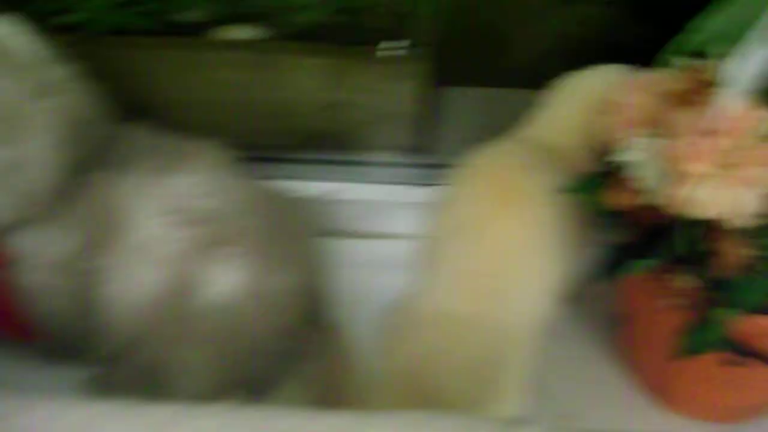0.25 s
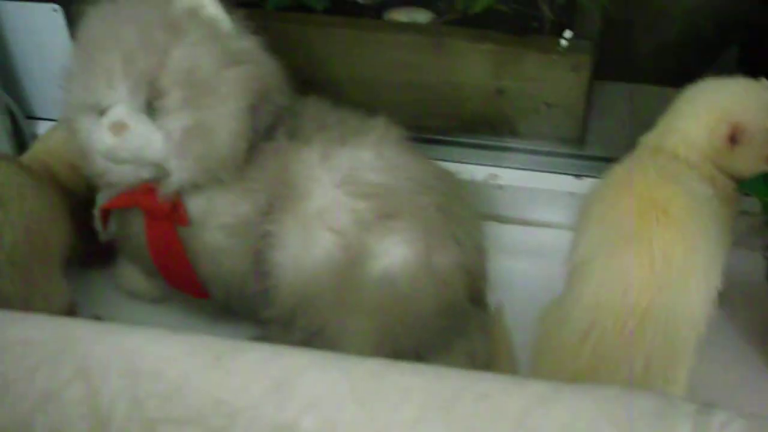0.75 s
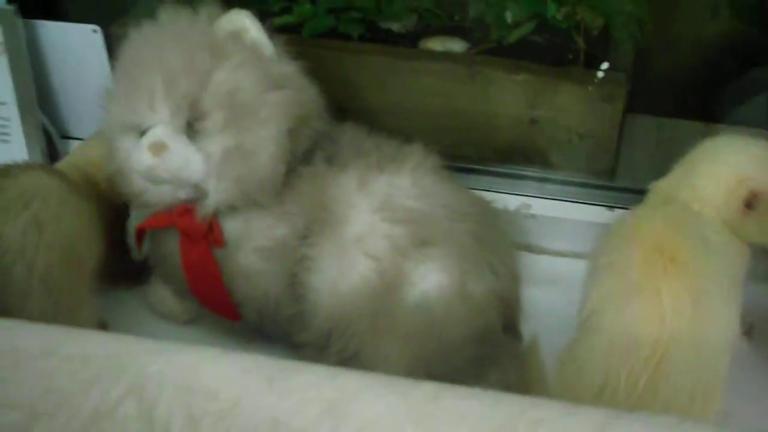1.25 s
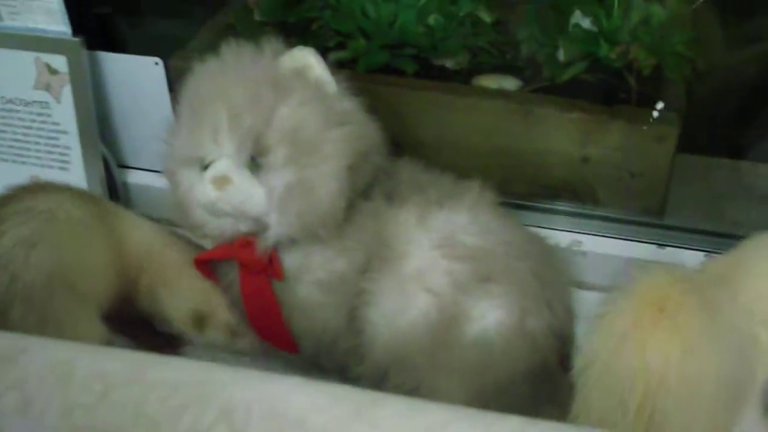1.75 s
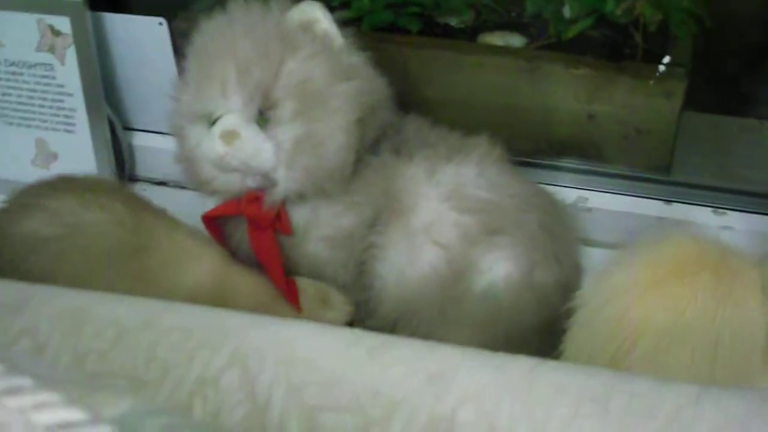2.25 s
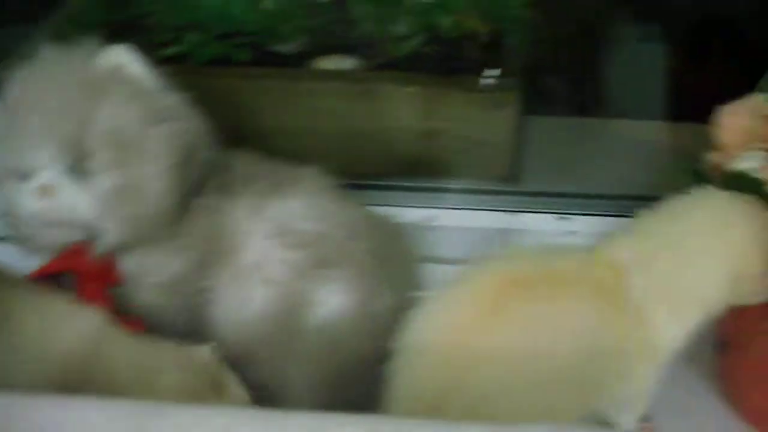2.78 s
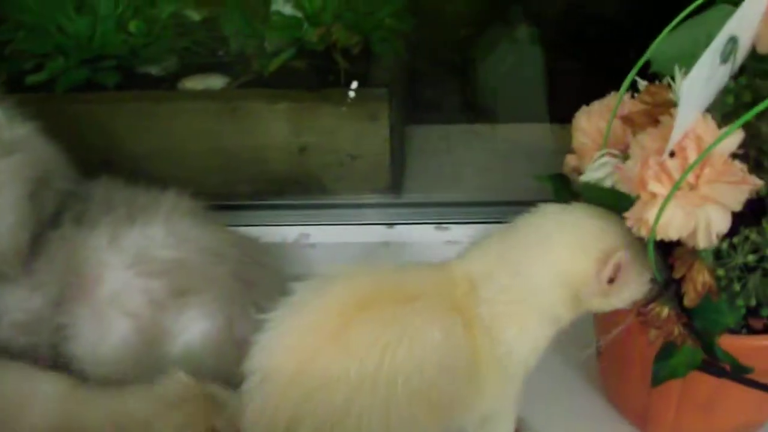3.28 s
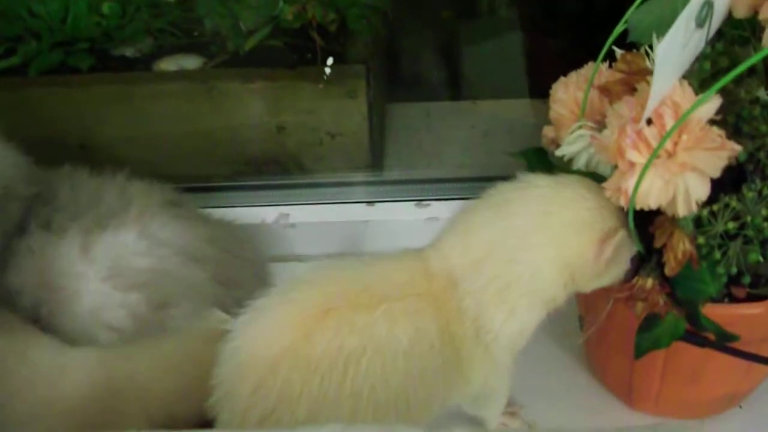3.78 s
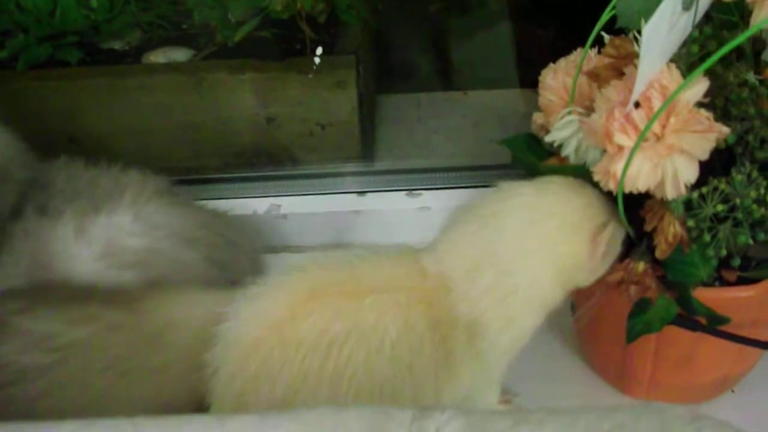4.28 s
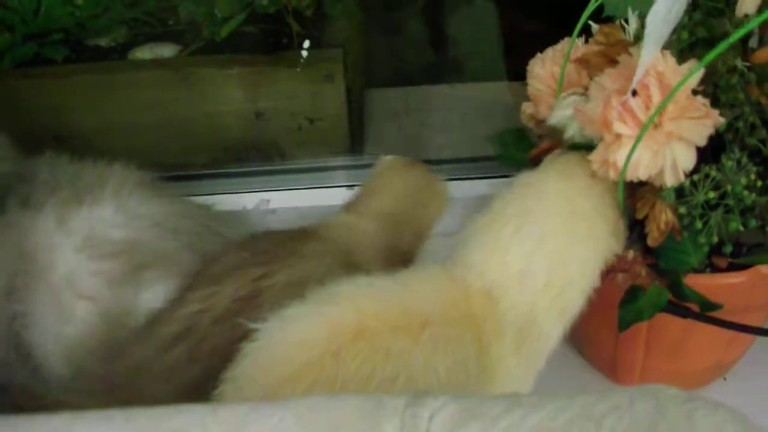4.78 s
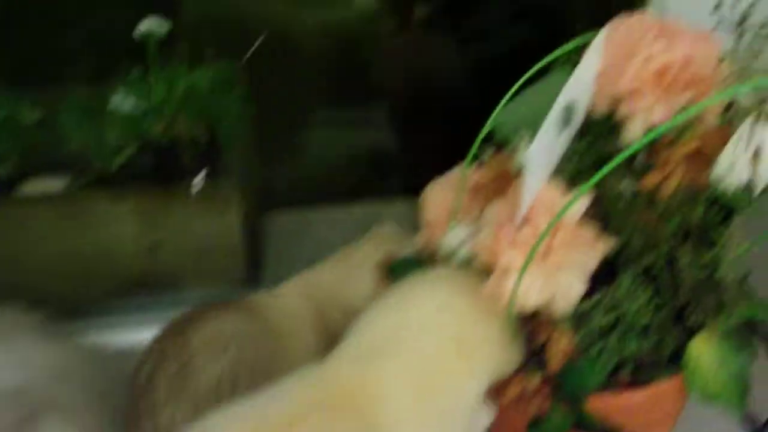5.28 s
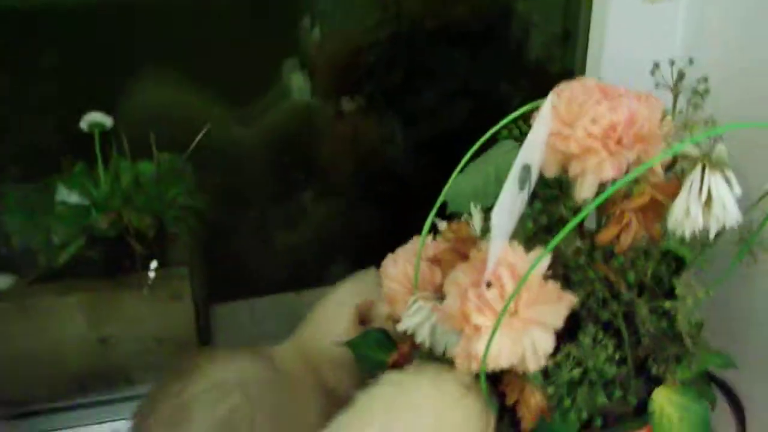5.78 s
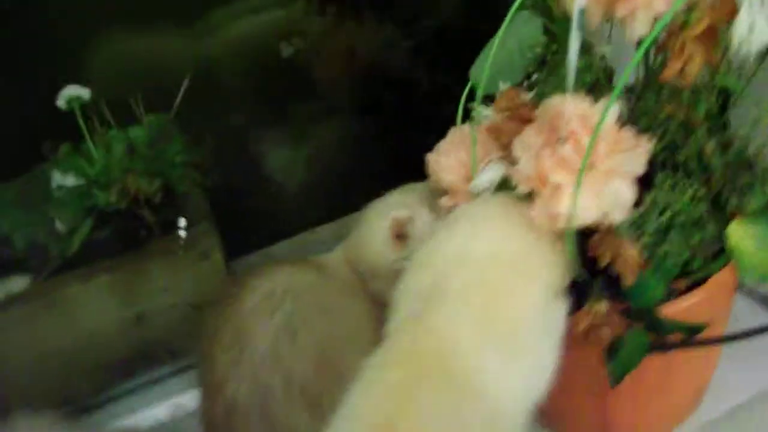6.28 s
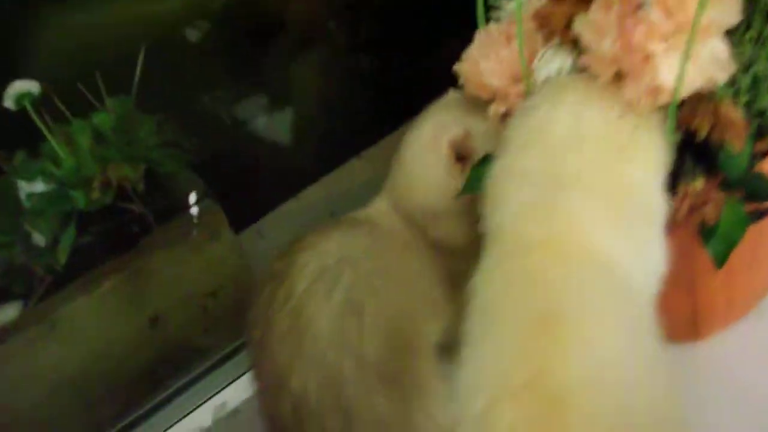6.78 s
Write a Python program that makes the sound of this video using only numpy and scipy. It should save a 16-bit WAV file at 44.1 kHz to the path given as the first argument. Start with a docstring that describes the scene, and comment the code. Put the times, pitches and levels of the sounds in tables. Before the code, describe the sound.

A close handheld microphone in a small, quiet room picks up ferrets on a windowsill. From 0 to 0.5 s, bright claw and stem clicks come in a quick flurry, with a plastic creak near 0.7 s. Clicks then become faint and scattered while fur brushes softly through leaves, a dry crackling swish fullest at about 2.1-2.5 s and fading after 3.4 s. At 3.65 s paws skid in a very short, sharp scrape that rings the sill; clicks follow near 4.5 s and a nearly dry scratch at 4.8 s. From 5.1 s fingers rub the casing, swelling until 5.3 s, with a low bump and sharp creaks around 5.4 s. Rustling continues; another creak comes at 6.1 s, a thump at 6.6 s, and rubbing peaks near 6.7 s. A click and scrape land at 6.9 s. Faint air, high hiss and low hum persist throughout.

```python
"""Two ferrets on a windowsill nose into a pot of flowers, heard from close by in a small quiet room.
First a flurry of claw and stem clicks (cracks with short rings), then fur in leaves (filtered grains),
fullest just after 2 s. Paws scrape in dense slips near 3.65 s, ringing the sill, and near 4.8 s, almost dry.
The hand-held camera bumps and creaks now and then (driven resonances), most from about 5 s, when fingers
also rub it; clicks and a scrape come near 6.9 s. Air, hiss (filtered noise) and hum (sines) lie under it all."""
import sys
import numpy as np
from scipy import signal
from scipy.fft import rfft, irfft
from scipy.io import wavfile
from scipy.ndimage import uniform_filter1d

SR = 44100
rng = np.random.default_rng(int(sys.argv[2]) if len(sys.argv) > 2 else 0)


def generate_wav(sig):
    """Save sig (samples, or channels by samples) to the path in sys.argv[1] as 16-bit PCM at SR."""
    pcm = np.round(np.clip(np.atleast_2d(sig).T, -1, 1) * 32767).astype(np.int16)
    wavfile.write(sys.argv[1], SR, pcm)


N = 310772
FREQ = np.maximum(np.fft.rfftfreq(N, 1 / SR), 1)
TIME = np.arange(N) / SR


# Claws and stems on the sill, close by; snap and body are relative to the ring:
# start_s [s], level_db [dB], ring_hz [Hz], decay_t60_s [s], snap_db [dB], body_db [dB]
CLAW_CLICKS = [(.014, -34.5, 4240, 0.0093, -19, 9), (.0666, -22.5, 5480, 0.053, -2, -3),
               (.0755, -25, 5770, 0.076, 2, 3), (.2029, -19.5, 4190, 0.021, -9.5, -33),
               (.2965, -27.5, 5600, 0.053, 2, -38), (.3539, -25, 4050, 0.0074, -9, -43),
               (.3632, -32, 5670, 0.021, 18, -24), (.382, -30.5, 9720, 0.041, -9, -32),
               (.418, -25.5, 3600, 0.03, 6.5, 0), (.456, -38.5, 3570, .064, -1, 3),
               (.599, -36, 3000, 0.064, 15.5, 20.5), (.6837, -39.5, 4470, 0.026, 9, 2),
               (.897, -38.5, 5000, .045, -3, -8.5), (.943, -41.5, 4960, 0.027, 3, -3),
               (1.024, -37.5, 6150, 0.043, -13, -32), (1.330, -40.5, 5900, .01, 18, -15),
               (1.631, -36.5, 4900, 0.021, -2, -16), (1.679, -43.5, 5600, 0.018, -1, -23),
               (1.898, -42.5, 4560, 0.0085, 9, -13), (1.997, -42, 6040, 0.013, 14, -26),
               (2.180, -37, 1200, 0.054, -17, 4), (2.245, -45, 1240, 0.061, -12, 3),
               (2.465, -37.5, 4220, 0.038, -22, -24), (2.537, -44.5, 7000, .015, -4, -24),
               (2.724, -42.5, 4870, 0.012, -2, -16), (2.771, -41, 4500, 0.033, 10, 4),
               (3.004, -35.5, 5000, 0.051, 7, 5.5), (3.6225, -30, 4340, 0.032, -5, -10),
               (3.6465, -27.5, 3220, 0.03, -26, -33), (3.6497, -22.5, 4680, .027, -34, -40),
               (3.654, -28.5, 1770, 0.074, -24, -21), (3.6587, -28, 4900, .015, -23, -29),
               (4.496, -29.5, 5560, 0.041, 5.5, -13), (4.5148, -35, 5740, 0.01, 11, -5),
               (4.543, -38, 5700, 0.0063, 21, 3), (5.6782, -30.5, 2670, 0.019, 8, -28),
               (5.814, -37.5, 3860, .019, -1, -14), (6.078, -35, 5900, 0.024, 10.5, 5.5),
               (6.337, -40.5, 2810, 0.021, -14, -16), (6.398, -42.5, 5000, 0.0077, -6, 1),
               (6.4445, -27, 5400, 0.0055, 4.5, -20), (6.5805, -30, 1900, 0.015, -8, 12),
               (6.906, -31, 1280, 0.096, -16, 17), (6.934, -22.5, 4600, 0.034, -5, -1.5)]


def clicks():
    """A claw or stem snaps: a bright crack, a short ring in a spray of micro-slips, and a dull body."""
    out = np.zeros(N)
    t = TIME[:SR // 10]
    for start_s, level_db, ring_hz, t60_s, snap_db, body_db in CLAW_CLICKS:
        decay = undb(-60 * t / t60_s)
        spray, snap, dull = rng.standard_normal((3, len(t))) * decay
        partials = sum(undb(gain_db) * np.sin(2 * np.pi * ratio * ring_hz * t)
                       for ratio, gain_db in [(1, 8), (1.1, -27), (1.8, -22)])
        # the ring is damped sooner than the spray, as the claw stays in touch
        damped_ring = blow(partials * decay * np.exp(-t / 0.009))
        ringing_spray = blow(ring(ring(spray, ring_hz, .5 * ring_hz), ring_hz, 1.0 * ring_hz))
        tone = blow(ringing_spray + undb(-2.5) * damped_ring)
        crack = blow(soften(ring(snap, 6600, 8300), 15200))
        thud = blow(soften(ring(dull, 1470, 2300), 2400))
        click = blow(tone + undb(snap_db) * crack + undb(body_db) * thud)
        add(out, start_s, undb(level_db) * click)
    return out


# Paws skidding on the sill, close by; ring_db is the sill relative to the scratch:
# peak_s [s], level_db [dB], rise_s [s], fall_s [s], ring_db [dB]
PAW_SCRAPES = [(0.083, -54, 0.027, 0.019, -23), (3.652, -22.5, 0.003, 0.0038, 26),
               (4.72, -45.5, 0.036, 0.025, -18), (4.796, -29.5, 0.016, 0.017, -43),
               (6.937, -23.5, 0.0053, 0.0042, -27)]
# Resonances of the sill: mode_hz [Hz], width_hz [Hz], gain_db [dB]
SILL_MODES = [(1750, 400, -3), (2400, 350, -5), (3350, 250, -2), (4680, 280, 0), (4940, 250, -1),
              (5900, 500, -5), (7200, 350, -9), (8050, 300, -12)]
# Colour of claws scratching: freq_hz [Hz], relative density_db [dB per Hz]
SCRATCH_COLOUR = [(180, -30), (300, -7), (814, -13), (1140, -14.5), (1840, -10), (2570, -7.5), (4020, 1),
                  (4520, 2), (5340, 1), (12500, -11.5), (16000, -23)]


def scrapes():
    """Claws skid in dense slips: mostly dry scratching, but near 3.65 s mostly the ring of the sill."""
    slips = grains(5000, 1.0)
    scratch = colour(slips, SCRATCH_COLOUR)
    sill = unit(body(slips, SILL_MODES))
    out = np.zeros(N)
    for peak_s, level_db, rise_s, fall_s, ring_db in PAW_SCRAPES:
        distance = np.maximum((peak_s - TIME) / rise_s, (TIME - peak_s) / fall_s)
        stroke = np.exp(-distance ** 1.47 / 2)
        mix = (scratch + undb(ring_db) * sill) / np.hypot(1, undb(ring_db))
        out += undb(level_db) * stroke * mix
    return out


# Passes of a ferret through leaves or plush, before the flutter: peak_s [s], level_db [dB], rise_s [s]
FUR_BRUSHES = [(.02, -47.5, 0.058), (.26, -45.5, 0.026), (.55, -53, 0.048), (.735, -51, 0.028),
               (1.3, -51.5, 0.04), (1.67, -52.5, 0.07), (1.86, -51.5, 0.044), (2.08, -42.5, 0.037),
               (2.15, -42.5, 0.031), (2.29, -42, 0.017), (2.345, -42, 0.04), (2.44, -43, 0.049),
               (2.635, -45.5, 0.043), (2.8, -50, 0.063), (2.92, -49, 0.0065), (3.06, -46.5, 0.05),
               (3.21, -46, 0.041), (3.4, -47.5, 0.015), (3.92, -52, 0.06), (4.21, -53, 0.1),
               (4.45, -51, 0.1), (4.93, -45, 0.061), (5.29, -48.5, 0.23), (5.755, -45, .028),
               (5.9, -52, 0.051), (6.09, -51, 0.079), (6.3, -46.5, 0.12), (6.55, -44.5, 0.17),
               (6.87, -46.5, .045)]
# Colour of leaves under fur: freq_hz [Hz], relative density_db [dB per Hz]
LEAF_COLOUR = [(590, -41), (1000, -2), (1180, 2), (1500, -3), (2100, -0.5), (2560, -2), (3380, -3),
               (6040, -2), (9170, -7), (11000, -7.5), (16000, -10)]
STIR_DB = -67  # fur stirring between brushes, before the flutter
BRUSH_FALL = 0.88  # fall time over rise time: a brush ends faster than it builds


def rustle():
    """Fur brushes leaves and plush: a swish with sparse crackles, its bands wandering separately."""
    contact = grains(7000, 0.46) + undb(-7.5) * grains(300, 4.3)
    leaves = sum(ring(contact, hz, .2 * hz) * undb(3 * walk(60)) for hz in (3500, 4600, 5800, 7400, 10000))
    swish = colour(unit(leaves) + undb(-12.0) * unit(contact), LEAF_COLOUR)
    flutter = undb(2.2 * walk(170))
    return swish * flutter * swells(FUR_BRUSHES, STIR_DB, shape=1.36, fall=BRUSH_FALL)


# Single creaks at the microphone; a positive tilt favours the upper modes, a negative one the lower:
# start_s [s], level_db [dB], contact_cutoff_hz [Hz], tilt_db [dB per octave]
CASING_CREAKS = [(0.6144, -38.5, 3180, 12), (0.6755, -25.5, 2530, 1), (5.3692, -31.5, 4500, 12),
                 (5.4416, -19.5, 5030, 11.5), (5.4665, -30.5, 7500, 6.5), (6.1383, -18, 2980, -1),
                 (6.1867, -30.5, 5000, 4), (6.715, -26.5, 1540, 4)]
# Resonances of the plastic casing: mode_hz [Hz], width_hz [Hz], gain_db [dB]
CASING_MODES = [(780, 180, -5), (1160, 240, 0), (2620, 240, -5), (3150, 260, -4), (4800, 500, -18),
                (5530, 400, -17), (7600, 900, -23)]
# Stick-slip runs of the casing, level of each of the two chatter parts:
# start_s [s], end_s [s], level_db [dB]
CASING_SLIPS = [(0.11, 0.147, -44), (1.216, 1.323, -53.5), (2.194, 2.265, -57.5), (5.118, 5.208, -53.5),
                (5.365, 5.455, -41.5), (5.395, 5.4, -34), (5.723, 5.865, -52), (6.111, 6.161, -36.5),
                (6.164, 6.211, -41.5), (6.21, 6.433, -54.5), (6.879, 6.952, -43)]


def casing():
    """The camera's plastic shell gives under the grip, in single creaks and in runs of tiny slips."""
    out = np.zeros(N)
    push = signal.unit_impulse(SR // 20)
    for start_s, level_db, contact_hz, tilt_db in CASING_CREAKS:
        modes = [(hz, width_hz, gain_db + tilt_db * np.log2(hz)) for hz, width_hz, gain_db in CASING_MODES]
        add(out, start_s, undb(level_db) * blow(soften(body(push, modes), contact_hz)))
    slips = grains(4000, 1.4)
    bright_chatter = unit(soften(body(np.diff(slips, prepend=0), CASING_MODES), 6200))
    dull_chatter = unit(soften(ring(slips, 2620, 1360), 4040))
    pressure = sum(undb(level_db) * ((TIME > start_s) & (TIME < end_s))
                   for start_s, end_s, level_db in CASING_SLIPS)
    # average over 1/80 s to round the starts and ends
    return out + (bright_chatter + dull_chatter) * uniform_filter1d(pressure, SR // 80)


# Fingers tighten on the casing, then let go:
# start_s [s], release_s [s], pressure_db at the release [dB], growth_db [dB per s]
FINGER_GRIPS = [(5.113, 5.314, -42, 78), (6.488, 6.675, -35, 12), (6.676, 6.749, -27.5, 31)]
GRIP_ATTACK_S, GRIP_RELEASE_S = 0.0047, 0.012


def grip(start_s, release_s, pressure_db, growth_db):
    """Finger pressure sets in, grows steadily in dB and drops at the release."""
    attack = 1 - np.exp(-np.maximum(TIME - start_s, 0) / GRIP_ATTACK_S)
    drop = np.exp(-np.maximum(TIME - release_s, 0) / GRIP_RELEASE_S)
    return attack * undb(pressure_db + growth_db * np.minimum(TIME - release_s, 0)) * drop


# Colour of skin on the casing: freq_hz [Hz], relative density_db [dB per Hz]
SKIN_COLOUR = [(47, -31), (80, 7), (107, 5.5), (194, -3.5), (309, 4), (386, -2.5), (451, 3), (588, -10),
               (820, -3.5), (1860, -12), (6450, -10.5), (14000, -30), (16000, -38)]


def rub():
    """Fingers rub the casing: grains of skin friction and jerks that boom in the shell."""
    pressure = sum(grip(*row) for row in FINGER_GRIPS)
    skin = colour(grains(4000, 0.67), SKIN_COLOUR)
    # low resonances of the shell: Hz, width Hz, dB
    shell = [(314, 150, -15.0), (520, 1100, -5.0), (810, 300, -5.5)]
    jerks = sum(unit(ring(grains(500, 0.93), hz, width_hz)) * undb(gain_db + 1.2 * walk(70))
                for hz, width_hz, gain_db in shell)
    # the skin part grows a little faster than the pressure
    friction = skin * undb(3 * walk(70)) * (pressure / undb(-21)) ** 0.13
    return pressure * (friction + undb(-4.0) * jerks)


# The hand swings the camera: peak_s [s], level_db [dB], rise_s [s]
HAND_SWINGS = [(.63, -46.5, .04), (5.31, -44.5, 0.062), (5.73, -45, 0.025), (6.1, -46.5, .14),
               (6.7, -35, 0.047)]
TREMOR_DB = -61.5  # the hand held still


def sway():
    """The swaying hand gives a very low rumble, a resonance near 19 Hz driven by noise."""
    rumble = unit(soften(ring(rng.standard_normal(N), 19.0, 22), 83))
    return rumble * swells(HAND_SWINGS, TREMOR_DB, shape=0.76)


# Soft bumps on the camera; length is from the peak to 1/e:
# peak_s [s], level_db over one length [dB], pitch_hz [Hz], length_s [s]
SOFT_BUMPS = [(0.076, -46, 200, 0.075), (0.214, -40, 365, 0.021), (0.603, -43, 103, 0.011),
              (2.467, -41.5, 206, 0.0087), (5.031, -46.5, 160, 0.0051), (5.304, -36.5, 140, 0.031),
              (5.31, -31, 45.5, 0.023), (6.118, -37, 97, 0.0092), (6.253, -41, 151, 0.0072),
              (6.615, -26.5, 248, 0.0087), (6.698, -40, 60, 0.023), (6.943, -44, 337, 0.026)]


def bumps():
    """The hand bumps the camera: noise in a broad low resonance, swelling and fading smoothly."""
    out = np.zeros(N)
    for peak_s, level_db, pitch_hz, length_s in SOFT_BUMPS:
        boom = soften(ring(rng.standard_normal(N), pitch_hz, pitch_hz), 2 * pitch_hz)
        thump = boom * np.exp(-((TIME - peak_s) / length_s) ** 2)
        out += unit(thump) * undb(level_db) * np.sqrt(length_s * SR / N)
    return out


# Colour of the still room air: freq_hz [Hz], relative density_db [dB per Hz]
AIR_COLOUR = [(15, -53), (25, 3.5), (59, -5), (141, -8.5), (229, -5.5), (575, -13), (863, -14.5),
              (1330, -14.5), (2480, -18.5), (2760, -17.5), (5570, -20), (8360, -19.5), (10700, -15),
              (14800, -24.5), (16000, -29)]
# Swells of the 50 Hz hum: peak_s [s], amplitude_db [dB], rise_s [s]
MAINS_SWELLS = [(.17, -52, 0.21), (1.13, -50, 0.23), (3.4, -49, 0.067)]
AIR_DB, HISS_DB = -52, -56.5
HUM_DB, OVERTONE_DB = -62, -68  # sine amplitudes: 50 Hz between swells, and steady 100 Hz


def floor():
    """Still room air, a wavering mains hum and microphone hiss, which peaks high in the treble."""
    air = colour(rng.standard_normal(N), AIR_COLOUR) * undb(AIR_DB + 0.3 * walk(2.13))
    hiss = unit(ring(ring(rng.standard_normal(N), 10730, 1500), 10730, 1500))
    turn = 2 * np.pi * 50 * TIME
    hum = np.sin(turn) * swells(MAINS_SWELLS, HUM_DB, shape=1.4)
    overtone = undb(OVERTONE_DB) * np.sin(2 * turn)
    return air + undb(HISS_DB) * hiss + hum + overtone


def room(x, t60=0.25, wet_db=-12, near_db=-9):
    """Quick reflections from the window recess, then a short dull tail."""
    t = TIME[:SR // 2]
    near, far = rng.standard_normal((2, len(t))) * (t > .002)
    near = near * undb(-60 * t / 0.0086)
    far = soften(far * undb(-60 * t / t60), 8500)
    response = undb(near_db) * near / np.linalg.norm(near) + undb(wet_db) * far / np.linalg.norm(far)
    return x + signal.fftconvolve(x, response)[:N]


def undb(db):
    """Decibels to amplitude."""
    return 10 ** (np.asarray(db) / 20)


def unit(x):
    """Scale to rms 1."""
    return x / np.sqrt(np.mean(x ** 2) + 1e-20)


def blow(x):
    """Scale a short sound to the energy of 5 ms at rms 1."""
    return x * np.sqrt(.005 * SR / np.sum(x ** 2))


def add(track, start_s, x):
    """Mix x into the track from start_s."""
    i = max(int(start_s * SR), 0)
    track[i:i + len(x)] += x[:N - i]


def colour(x, points):
    """Filter by a (Hz, dB) spectrum, then scale to rms 1."""
    hz, db = np.transpose(points)
    gain = undb(np.interp(np.log(FREQ), np.log(hz), db))
    return unit(irfft(rfft(x) * gain, N))


def ring(x, hz, width_hz):
    """One resonance, gain 1 at its centre."""
    hz = min(hz, .45 * SR)
    return signal.lfilter(*signal.iirpeak(hz, hz / min(width_hz, SR / 3), fs=SR), x)


def body(x, modes):
    """A set of resonances driven together."""
    return sum(undb(gain_db) * ring(x, hz, width_hz) for hz, width_hz, gain_db in modes)


def soften(x, hz, order=2):
    """Low-pass."""
    return signal.sosfilt(signal.butter(order, min(hz, SR / 2 - 1), fs=SR, output="sos"), x)


def walk(rate):
    """Chance values with a spread near 1, rate of them per second, joined by straight lines."""
    return np.interp(TIME * rate, np.arange(2000), rng.standard_normal(2000))


def grains(rate, spread_db):
    """Tiny slips at random moments, rate per second, a few much larger than the rest."""
    size = undb(spread_db * np.minimum(rng.exponential(size=N), 5)) * rng.standard_normal(N)
    return unit((rng.random(N) < rate / SR) * size)


def swells(rows, rest_db, shape=1.7, fall=1):
    """Gain that rises from a resting level and falls again around each (s, dB, rise s) row."""
    power = undb(rest_db) ** 2
    for peak_s, level_db, rise_s in rows:
        distance = np.maximum((peak_s - TIME) / rise_s, (TIME - peak_s) / (fall * rise_s))
        power = power + undb(level_db) ** 2 * np.exp(-distance ** shape)
    return np.sqrt(power)


def scene():
    """Clicks and scrapes sound through the room; every other layer reaches the microphone dry."""
    on_sill = room(clicks() + scrapes())
    handling = rub() + sway() + bumps()
    return (on_sill + rustle() + casing() + handling + floor())[None]


TOP_HZ = 15900


def record(dry):
    """The camera cuts the top with a steep low-pass."""
    return signal.sosfilt(signal.ellip(10, .2, 80, TOP_HZ, fs=SR, output="sos"), dry)


dry = scene()
out = record(dry)
generate_wav(out)
```